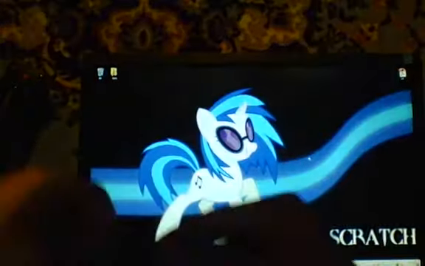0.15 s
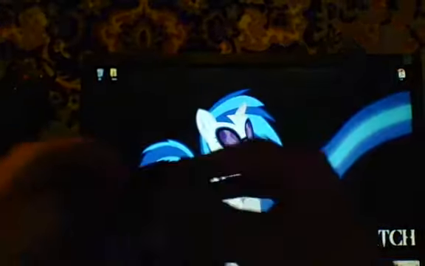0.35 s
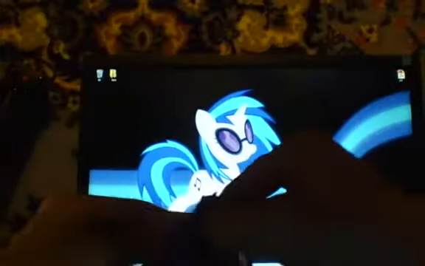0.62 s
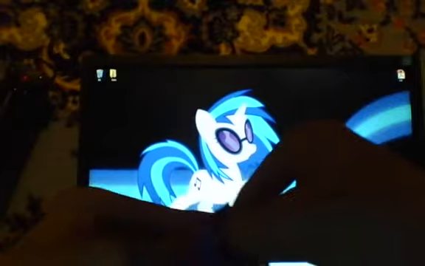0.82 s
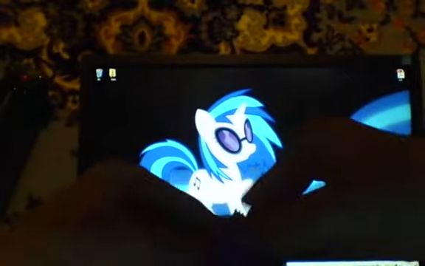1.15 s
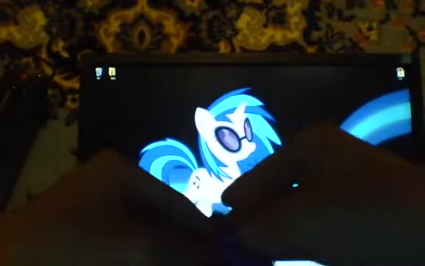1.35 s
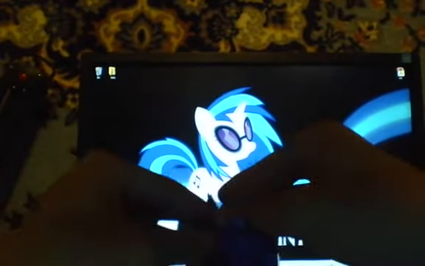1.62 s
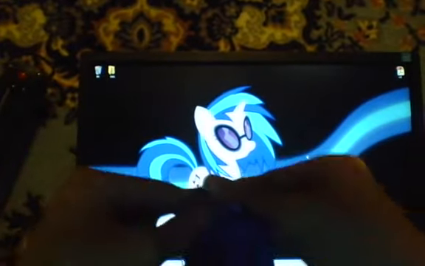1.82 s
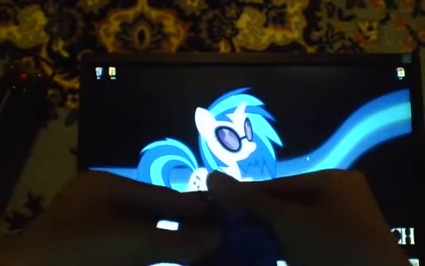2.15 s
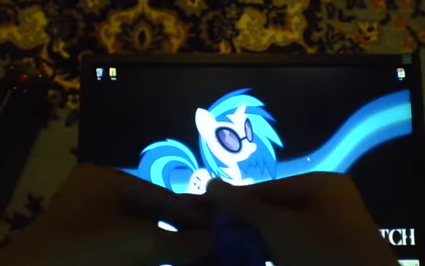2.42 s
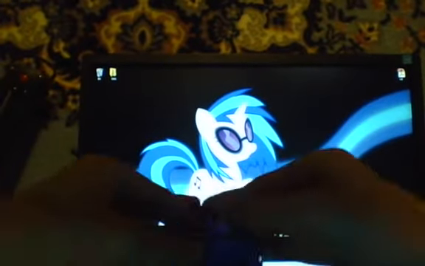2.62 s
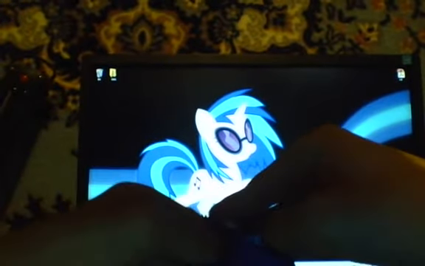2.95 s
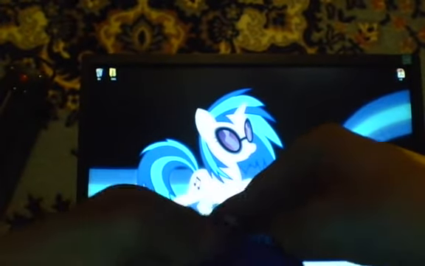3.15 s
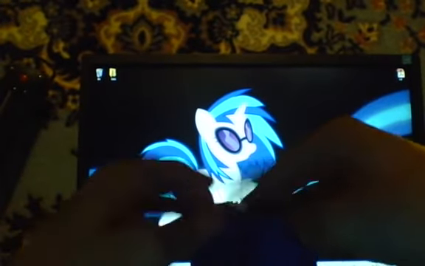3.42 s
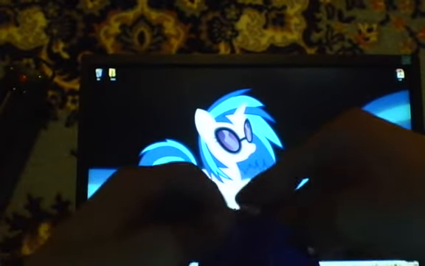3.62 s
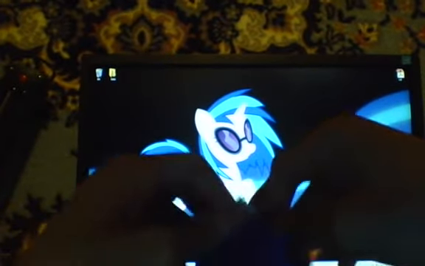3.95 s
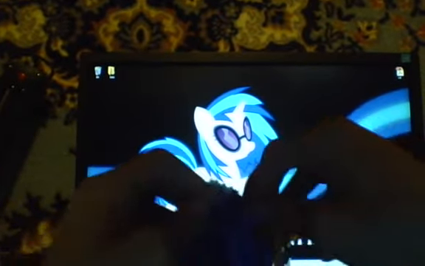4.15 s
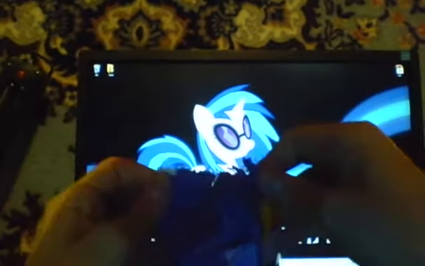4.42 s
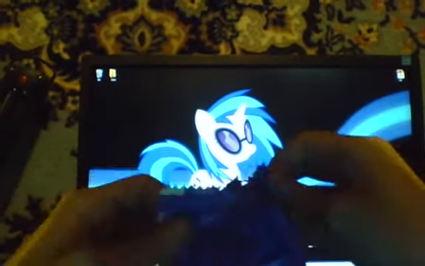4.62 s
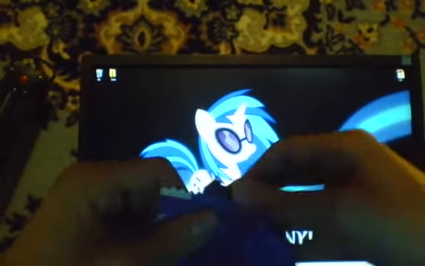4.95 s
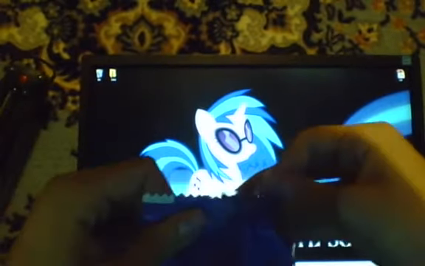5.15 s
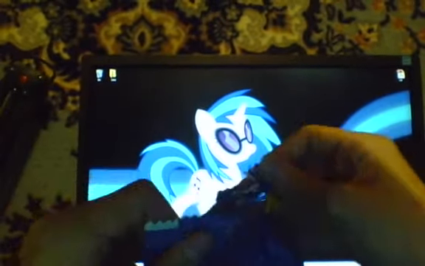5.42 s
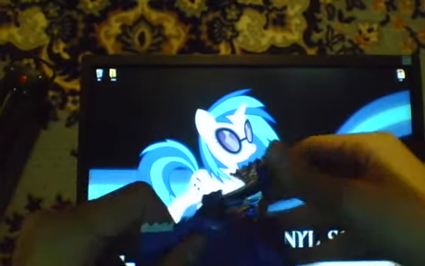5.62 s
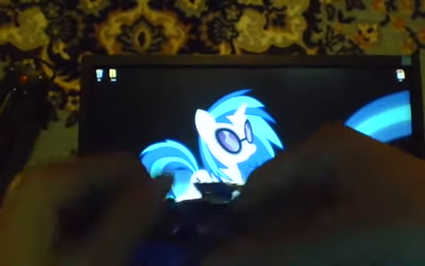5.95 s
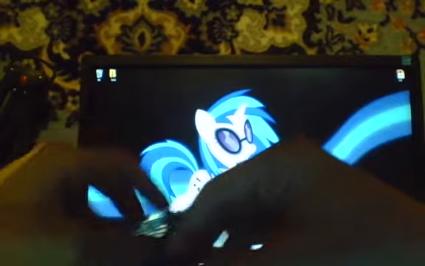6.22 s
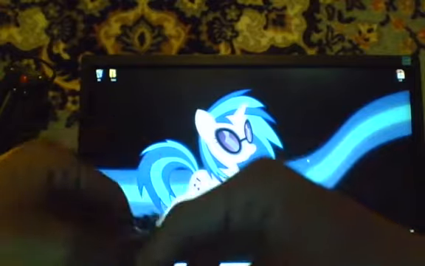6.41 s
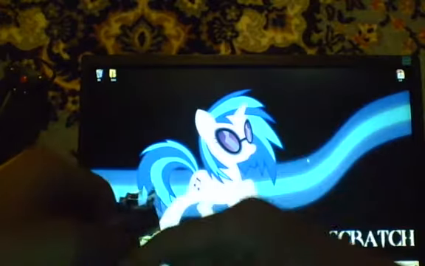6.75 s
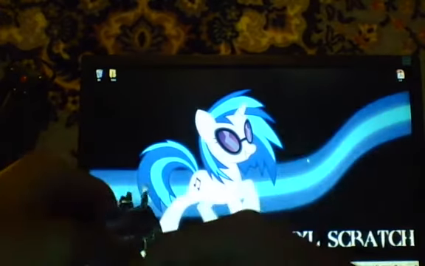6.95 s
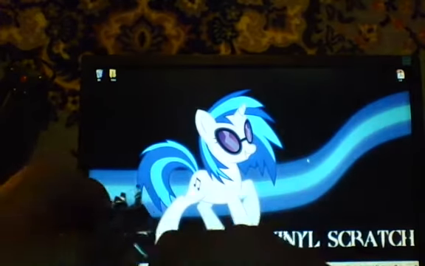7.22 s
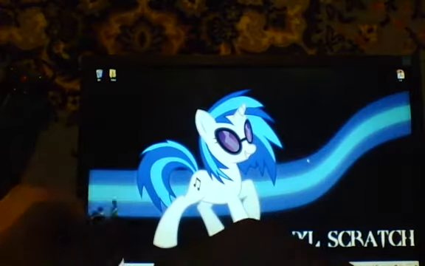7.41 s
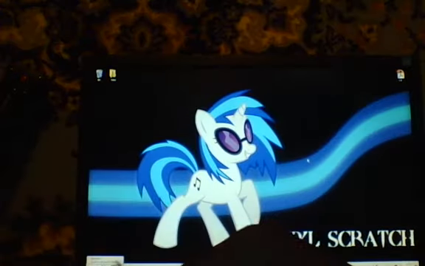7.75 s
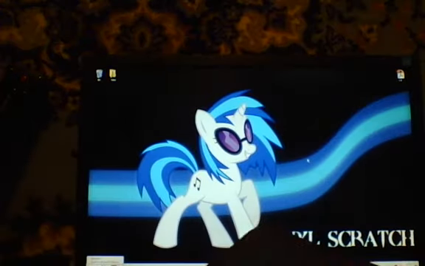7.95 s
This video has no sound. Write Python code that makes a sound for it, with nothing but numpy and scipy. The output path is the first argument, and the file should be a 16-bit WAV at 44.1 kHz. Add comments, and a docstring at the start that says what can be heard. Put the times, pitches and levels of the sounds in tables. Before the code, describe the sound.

A stiff plastic snack wrapper crackles and crinkles sharply in two hands, very close, with short tearing rasps, then thins to sparse ticks.

```python
"""Two hands pull open and crumple a plastic snack wrapper over a desk, very close to a small microphone.
From the start each squeeze excites a crackle of facets, creases buckle singly and seams rip in short rasps,
while flexing panels drive the enclosed air in soft pops. From 5.3 s the wrapper's sound slowly gains a hollow
band near 860 Hz; near 6.5 s film stick-slips on film in a thin squeak. Throughout, a small room answers with
echoes and a short tail over a steady hush, and the microphone rounds off the tallest peaks."""
import sys
import numpy as np
from scipy import signal
from scipy.fft import rfft, irfft, next_fast_len
from scipy.io import wavfile
from scipy.ndimage import uniform_filter1d

SR = 44100
rng = np.random.default_rng(int(sys.argv[2]) if len(sys.argv) > 2 else 0)


def dump(signal):
    """Clip the signal to [-1, 1] and save it as 16-bit WAV at the path in sys.argv[1]."""
    limited = np.clip(np.atleast_2d(signal).T, -1, 1)
    pcm = np.round(limited * 32767).astype(np.int16)
    wavfile.write(sys.argv[1], SR, pcm)


N = 355875

# Levels in the tables are relative; each source adds its own gain.
# The loudest creases snapping through: t/s, level/dB, facet ring f/Hz, brightness/dB
SNAPS = [(0.0093, -19, 4400, -1), (0.056, -15.5, 4630, 6), (0.084, -14, 4090, 7), (0.0985, -10, 3810, 2),
         (0.124, -6.5, 4130, 6), (0.3195, -17, 8450, 13), (0.421, -6.5, 1920, 2), (0.4559, -12, 6960, 13),
         (0.5111, -13, 5430, 5), (0.5241, -8, 7170, 12), (0.5522, -11, 5240, 6), (0.646, -8.5, 1980, -14),
         (0.7, -11, 7540, 7), (0.8073, -15, 6220, 6), (0.8205, -8.5, 5700, 9), (0.843, -11.0, 8050, 12),
         (0.898, -9, 7950, 2), (0.9368, -4, 5670, 9), (0.943, -14, 6960, 21), (0.9612, -14, 5900, 9),
         (1.0034, -13.5, 8700, 32), (1.0321, -14, 5810, 11), (1.123, -18.5, 5860, 8),
         (1.1585, -11, 7400, 11), (1.202, -12, 5040, 4), (1.2268, -9.5, 1180, -4), (1.251, -18, 3250, 3),
         (1.286, -28, 4800, 21), (1.3168, -13, 4290, 14), (1.348, -20, 7750, 18), (1.401, -18.0, 7600, 16),
         (1.432, -16, 7640, 15), (1.4728, -13.5, 3250, 20), (1.53, -10, 7600, 17),
         (1.5454, -17.5, 1920, -4), (1.5843, -16.5, 5350, 15), (1.6253, -9.5, 7470, 7),
         (1.6644, -14, 7970, 6), (1.6796, -18, 6300, 9), (1.7084, -16, 6440, 13), (1.7231, -11.5, 1880, 8),
         (1.736, -15.5, 6590, 6), (1.801, -11, 1810, -11), (1.872, -13.0, 5530, 3), (1.882, -21, 1900, -12),
         (1.9146, -12.5, 2640, 1), (1.932, -18.0, 3570, 15), (1.9593, -24, 7800, -2),
         (1.9828, -16, 6420, 2), (2.0346, -10.5, 7700, 9), (2.047, -7, 5100, 10), (2.0559, -15, 1200, -2),
         (2.087, -6.5, 7580, 23), (2.1262, -12.5, 4330, 9), (2.1681, -9, 3490, 5), (2.183, -11, 8000, 27),
         (2.2044, -13.5, 1980, 2), (2.2318, -10, 1770, 6), (2.2457, -16, 1900, -19),
         (2.2741, -5.5, 6100, 15), (2.3608, -15, 4390, 11), (2.4052, -9.5, 1840, -21),
         (2.451, -17.5, 7150, 7), (2.4801, -18.5, 2230, 1), (2.53, -17.0, 7760, 4), (2.5614, -11, 4760, 2),
         (2.6085, -7.5, 7840, 2), (2.629, -6, 8150, 18), (2.6925, -20, 3130, -5), (2.729, -14.5, 8400, 3),
         (2.8218, -8, 8100, 10), (2.916, -12, 7540, 10), (2.951, -12, 8230, -3), (3.0034, -11.5, 8570, 25),
         (3.0782, -13.5, 4590, 22), (3.0937, -12.0, 8870, 33), (3.1264, -14, 8890, 35),
         (3.2034, -7.5, 7690, 12), (3.284, -2.5, 3010, -2), (3.327, -6.5, 1810, 7), (3.3456, -9, 7360, 15),
         (3.3694, -9, 2700, 7), (3.4074, -1, 6840, 16), (3.4784, -6.5, 7430, -1), (3.5085, -7, 6370, 7),
         (3.5672, -12.0, 1870, -1), (3.5962, -8.5, 8120, 3), (3.6404, -15.5, 4930, -8),
         (3.69, -10, 1590, 0), (3.708, -12.5, 8460, 12), (3.738, -13.5, 6660, 0), (3.763, -6, 4400, 12),
         (3.7783, -10.0, 1680, 9.5), (3.812, -5.5, 4960, 5.5), (3.829, -8, 7340, 14),
         (3.8857, -7.5, 8050, -7.5), (3.8906, -11, 8100, 14), (3.9378, -12, 8590, 29), (3.955, -9, 5800, 0),
         (3.9616, -6, 1210, 6), (4.1846, -8, 2780, 13), (4.251, -3, 8250, 16), (4.4954, -9.5, 6600, 3),
         (4.6027, -7, 1270, 14), (4.6102, -13, 5030, 15), (4.6359, -14.5, 1750, -3), (4.6714, -8, 1850, 5),
         (4.718, -27, 5840, 12), (4.7415, -13.5, 5490, 7), (4.788, -9.5, 2970, 3), (4.8017, -8, 5540, 6),
         (4.8282, -6, 1600, 1), (4.842, -6.5, 1680, 6), (4.9544, -7, 8530, 2), (4.962, -5.5, 8530, 0),
         (4.9963, -12, 1460, 9), (5.035, -8.5, 4540, 12), (5.039, -7, 8800, 3), (5.0546, -6, 5630, 7),
         (5.078, -10, 8450, 13), (5.11, -11.5, 5400, 12), (5.131, -5, 3530, 16), (5.1674, -8, 8350, -2),
         (5.3366, -8, 3250, 4), (5.4233, -21.5, 7800, 11), (5.451, -12.5, 8900, 9.5),
         (5.485, -11.5, 4700, 1), (5.5388, -30, 7500, 3), (5.558, -12.5, 4160, 11), (5.64, -28, 1190, -12),
         (5.6903, -29.0, 1640, -1), (5.7382, -25, 7240, 19), (5.7504, -12.5, 6040, 9),
         (5.8169, -16, 3420, 16), (5.8254, -10, 2600, -5), (5.896, -16.0, 4460, 8), (5.9208, -13, 4690, 5),
         (5.945, -12, 3450, 10), (5.9644, -9.5, 4540, 13), (5.992, -10, 5000, 7), (6.057, -8.5, 5370, 3),
         (6.0975, -15, 7040, -3), (6.1207, -14.5, 6930, -1), (6.1782, -11, 3200, 5),
         (6.1893, -6.5, 7320, 10), (6.2344, -8, 5400, 7), (6.305, -10.5, 3050, -1),
         (6.3443, -14, 1370, -13), (6.389, -9.5, 1360, 0), (6.4063, -3.5, 4460, -1),
         (6.5805, -8.5, 3260, 3), (6.608, -12.5, 3420, 1), (6.6713, -15.5, 3020, 9), (6.7, -17.5, 5210, -3),
         (6.7594, -19.5, 4860, -2), (6.834, -22.5, 7860, 0), (6.8924, -29.0, 6960, 6),
         (7.005, -12, 5230, 5), (7.0445, -17.5, 4800, 8), (7.1058, -33.5, 1690, 0), (7.161, -25, 2350, -10),
         (7.2187, -11, 1910, 9), (7.274, -16.5, 7170, 15), (7.2888, -13.5, 3950, 11),
         (7.323, -15.5, 1810, 7), (7.3682, -13, 1890, 10), (7.375, -9, 4630, -2), (7.4504, -7.5, 1880, 0),
         (7.4672, -16, 1540, -5), (7.488, -11, 9060, 10), (7.504, -9.5, 4450, 0), (7.578, -11.5, 2400, 0),
         (7.6324, -14.0, 6700, 14), (7.7044, -3.5, 4070, -3), (7.737, -16.5, 4070, 5),
         (7.802, -22, 1360, 14), (7.8557, -20, 2610, -3), (7.8932, -18, 5500, 8), (7.9422, -21, 3420, -7),
         (7.9983, -14.5, 4180, 8.5), (8.0322, -22.5, 5840, 9), (8.059, -12.5, 8980, 12)]
# Squeezes of the hands: start t/s, end t/s, tiny facets level/dB, wide facets level/dB, rubbing level/dB
SQUEEZES = [(0, 0.05, -21.5, -20, -30.0), (0.095, 0.32, -25, -22.0, -29), (0.407, 0.555, -24, -21, -41.0),
            (0.562, 0.66, -18, -16, -28), (0.68, 0.727, -18, -22.5, -40), (0.81, 0.978, -18.5, -22, -52),
            (0.997, 1.09, -24.5, -56, -69), (1.104, 1.367, -19.5, -29.0, -55),
            (1.385, 1.548, -17.5, -23.5, -40.5), (1.707, 1.808, -26, -23, -39.5),
            (2.017, 2.148, -24.5, -27, -49), (2.183, 2.36, -21.5, -25.5, -67),
            (2.321, 2.418, -17.5, -24, -64), (2.55, 2.674, -18, -20.5, -40),
            (2.771, 2.893, -18.5, -22, -46), (2.904, 3.034, -21, -24, -45), (3.219, 3.3, -16.5, -21.5, -39),
            (3.344, 3.532, -17.5, -20, -38), (3.55, 3.846, -23, -25.5, -39.0),
            (3.946, 4.231, -15.5, -22, -31), (4.26, 4.46, -17, -18, -23), (4.482, 4.651, -23.5, -23, -32),
            (4.768, 4.905, -22.5, -22.0, -35.5), (4.957, 5.163, -22.5, -24.5, -33.5),
            (5.128, 5.349, -20, -17, -28), (5.427, 5.533, -27.5, -32, -49), (5.88, 6.096, -25, -26, -39.5),
            (6.102, 6.262, -18, -18.5, -35), (6.305, 6.46, -23.5, -35, -42),
            (6.482, 6.571, -12.5, -18, -32), (6.587, 6.773, -25.5, -31, -65), (7.018, 7.04, -31, -29, -44),
            (7.205, 7.222, -18.5, -36, -43), (7.28, 7.415, -31, -23, -33.5), (7.433, 7.53, -30, -24.0, -34),
            (7.633, 7.82, -28.5, -23, -39.5), (7.843, 7.921, -32.5, -22, -37)]
# Faint crackle of the held film, present throughout and beneath the squeezes: t/s, level/dB
HELD_CRACKLE = [(0, -24), (.35, -25.5), (.78, -29), (1.5, -59), (1.6, -41), (1.75, -36), (1.85, -42),
                (2.0, -35), (2.2, -30), (2.5, -36), (2.85, -27.5), (3.07, -40), (3.2, -27), (4.45, -20.5),
                (4.69, -52), (4.8, -34), (5.3, -39), (5.62, -49), (5.78, -45), (5.9, -30.5), (6.5, -23.5),
                (6.82, -58), (6.9, -48), (6.96, -52), (7.13, -57), (7.2, -33), (7.5, -37.5), (7.98, -48),
                (8.06, -23)]
# Film sliding on film instead of buckling (a reversed pair is empty): start t/s, end t/s
SLIDES = [(2.185, 2.21), (2.79, 2.74), (3.145, 3.195), (3.215, 3.24), (4.125, 4.165), (6.48, 6.6)]
# The seam ripping and folds collapsing in a run: start t/s, end t/s, level/dB, tiny-to-wide facet level/dB
RIPS = [(0.134, 0.178, -17.5, -1), (0.201, 0.239, -13, 0), (0.565, 0.604, -12, 4),
        (1.759, 1.774, -6.5, 5.5), (2.359, 2.397, -11.5, 11), (3.234, 3.268, -8, 10.5),
        (3.991, 4.118, -10, 5), (4.129, 4.155, -8, 11), (4.275, 4.359, -2.5, 5.5), (4.403, 4.44, -12, 0.5),
        (5.03, 5.046, -13, 2.5), (5.171, 5.247, -12, 4), (6.181, 6.196, -16, 0)]
# Whole panels of the bag flexing: t/s, level/dB, pitch f/Hz
FLEXES = [(0.048, -24.0, 496), (0.154, -11.5, 697), (0.224, -15, 290), (0.597, -19, 486),
          (1.17, -27.0, 428), (1.511, -20.5, 546), (1.763, -12, 466), (2.05, -16, 515), (3, -31, 444),
          (3.406, -27.0, 398), (3.479, -21.5, 388), (3.564, -22, 470), (3.886, -25, 450), (3.961, -20, 463),
          (4.106, -16.5, 483), (4.184, -24, 447), (4.344, -7, 473), (4.501, -22, 466), (4.604, -20, 475),
          (4.962, -17.5, 434), (5.031, -17, 470), (5.16, -16.0, 409), (5.235, -17, 468), (5.265, -15, 480),
          (5.335, -17, 290), (5.468, -19.5, 443), (5.635, -34.5, 680), (5.698, -29.5, 692),
          (5.846, -31, 483), (5.942, -20, 435), (6.137, -15, 472), (6.189, -16, 462), (6.385, -17.5, 438),
          (6.759, -27, 468), (6.833, -25, 229), (7.058, -26.5, 466), (7.104, -29.5, 474),
          (7.215, -21.5, 477), (7.281, -20.5, 300), (7.318, -20.5, 283), (7.501, -20.5, 470),
          (7.678, -24, 483), (7.859, -23.5, 518)]
# The taut strip singing as film slides on film: t/s, level/dB
SQUEAK = [(6.465, -55), (6.495, -24), (6.53, -12), (6.545, -7), (6.57, -26), (6.595, -60)]
# The bag bumping against the moving hands: start t/s, end t/s, level/dB
BUMPS = [(0, .02, -37), (0.16, 0.256, -25), (0.412, 0.467, -35), (0.507, 0.653, -29.5), (0.902, 0.952, -35),
         (1.246, 1.3, -37), (1.48, 1.545, -36.5), (1.74, 1.78, -48), (2.03, 2.087, -39), (2.59, 2.652, -38),
         (3.26, 3.42, -41), (4.28, 4.38, -34), (4.952, 4.997, -30.5), (5.18, 5.356, -32.5),
         (6.367, 6.56, -39.5), (6.834, 6.883, -43), (6.998, 7.057, -39.5), (7.632, 7.693, -29.5),
         (7.756, 7.88, -46)]
# Resonances of the air in the bag and its panels: f/Hz, width f/Hz, lift level/dB
BAG_MODES = [(226, 31, 2.5), (310, 107, 4), (474, 82, 9), (693, 79, 7), (968, 40, 2.5), (1403, 230, 4.5),
             (1810, 240, 5)]
# Spectrum of a snap: f/Hz, level/dB
SNAP_COLOUR = [(60, -26), (170, -27), (290, -18), (750, -14.5), (1000, -7.5), (3000, 0), (7800, 2.5),
               (9500, -1.5), (12000, -11), (16000, -23)]
# Spectrum of the tiny facets: f/Hz, level/dB
TINY_COLOUR = [(1000, -32.5), (2800, -8), (4500, -3.5), (7800, 0), (9500, -3.5), (12000, -14), (16000, -21)]
# Spectrum of the wide facets: f/Hz, level/dB
WIDE_COLOUR = [(200, -22.5), (750, -15.5), (1000, 0), (2500, -1), (3700, -1), (5500, -4.5), (10000, -34)]
# Spectrum of rubbing fingers and of the puff of a flexing panel: f/Hz, level/dB
RUB_COLOUR = [(80, -23.5), (165, -6), (200, -1.5), (280, 2.5), (500, 1), (800, -1.5), (1400, -15),
              (4000, -50)]
# Spectrum of the dull rumble of hands and bag: f/Hz, level/dB
RUMBLE_COLOUR = [(15, -17), (28, -5), (42, -1), (62, -4), (90, 1), (125, -3), (185, 0), (300, -16),
                 (800, -55)]
# Decay of the furnished room: f/Hz, 60 dB decay time t/s
ROOM_DECAY = [(150, 0.15), (500, 0.2), (2000, 0.27), (7000, 0.072), (14000, 0.083)]
# Spectrum of the room's background: f/Hz, level/dB
HUSH_COLOUR = [(25, 10), (130, 18), (250, -16), (560, -1), (900, -29), (2500, -36), (7000, -44),
               (11000, -41), (16000, -42)]
# Response of the microphone: f/Hz, level/dB
MICROPHONE = [(20, -0.5), (8000, 0.5), (10000, -2), (12000, -6.5), (16000, -7.5)]

# Envelopes of hand movements: attack/s, release time constant/s, rise from edge to middle/dB
GRIP_S, RELAX_S, ARCH_DB = 0.022, 0.015, 1.5
BUMP_RISE_S, BUMP_FADE_S, BUMP_ARCH_DB = 0.0078, 0.034, 5
# The film quiets under strain before a snap and crackles as it settles: time constants/s, levels/dB
STRAIN_S, STRAIN_DIP_DB = 0.018, 2.5
SETTLE_S, SETTLE_DB = 0.019, -16.5
HOLLOW_S = 5.3  # the hollow band begins to grow
TOP_HZ = 15800  # band limit of the microphone


def amp(db):
    """The amplitude ratio equivalent to a level in decibels."""
    return 10 ** (np.asarray(db) / 20)


def unit(x):
    """The signal normalised to rms 1."""
    return x / np.sqrt(np.mean(x ** 2) + 1e-20)


def along(points, hz):
    """Interpolation of (f/Hz, value) points on a logarithmic frequency axis."""
    f, value = np.transpose(points)
    return np.interp(np.log(hz + 1), np.log(f + 1), value)


def curves(rows):
    """Linear interpolation in time: one value per sample for each column after t."""
    s, *columns = np.transpose(rows)
    t = np.arange(N) / SR
    return [np.interp(t, s, column) for column in columns]


def place(times, sounds):
    """Superposition: rows of sound summed at their start times."""
    first = np.maximum(np.round(times * SR), 0).astype(int)
    at = first[:, None] + np.arange(sounds.shape[1])
    return np.bincount(at.ravel(), sounds.ravel(), N)[:N]


def causal(gain_db):
    """Minimum phase: folding the cepstrum gives a causal response with these gains."""
    cepstrum = irfft(np.log(np.maximum(amp(gain_db), 1e-6)))
    k = np.arange(cepstrum.shape[-1])
    fold = np.where(k == 0, 1, 2 * (k < len(k) / 2))
    return np.exp(rfft(cepstrum * fold))


def bag_db(hz):
    """Resonance: each mode of the bag lifts the sound of the film around its centre frequency."""
    return sum(db / (1 + (2 * (hz - centre) / width) ** 2) for centre, width, db in BAG_MODES)


def through_bag(x, colour, size=4096):
    """Linear filtering: x takes on a spectrum and the resonances of the bag."""
    hz = np.fft.rfftfreq(size, 1 / SR)
    impulse_response = irfft(causal(along(colour, hz) + bag_db(hz)))
    return signal.oaconvolve(x, impulse_response)[:N]


def flicks(rate, size_db, life, size=400):
    """Shot noise: the rms-1 envelope of facets flicking at uneven moments, many small and a few large."""
    count = int(rate * N / SR)
    when, strength, length = rng.random((count, 3)).T[:, :, None]
    u = np.arange(size) / SR / (life * (.5 + length))
    power = (amp(size_db * strength ** 2) * u * np.exp(-u)) ** 2
    times = (np.arange(count) + 2 * when[:, 0]) / rate
    return unit(np.sqrt(place(times, power)))


def film(envelope, colour):
    """Modulated noise: the film flutters under an envelope and radiates through the bag at rms 1."""
    return unit(through_bag(envelope * rng.standard_normal(N), colour))


def stroke(start, end, attack, release, arch_db):
    """The envelope of one hand movement: it takes hold, swells toward its middle and decays."""
    t = np.arange(N) / SR
    progress = np.clip((t - start) / (end - start), 0, 1)
    swell = amp(arch_db * (np.sin(np.pi * progress) - 2 / np.pi))
    rise = np.clip((t - start) / attack + .5, 0, 1)
    return swell * rise * np.exp(-np.clip((t - end) / release, 0, 20))


def squeezing():
    """Power summation: squeezes combine into drives for tiny facets, wide facets and rubbing fingers."""
    shapes = np.array([stroke(start, end, GRIP_S, RELAX_S, ARCH_DB) for start, end, *_ in SQUEEZES])
    levels = np.array(SQUEEZES)[:, 2:].T
    return np.sqrt(amp(levels) ** 2 @ shapes ** 2)


def snaps(level_db, rise, ring_db, wide_db, ring_octaves, tilt, edge, scatter_db,
          after_db, after_t60, lead_db, lead, size=2048):
    """Snap-through buckling: a crease yields a little, flutters briefly and rings the facet beside it."""
    s, db, ring_hz, bright_db = np.transpose(SNAPS)[:, :, None]
    t = np.arange(size) / SR - .003  # begins 3 ms ahead of the snap
    hz = np.fft.rfftfreq(size, 1 / SR)
    pace, early, late = rng.random((len(s), 3)).T[:, :, None]

    def burst(start):
        """A smooth pulse that rises and decays at the crease's own pace."""
        u = np.maximum(t - start, 0) / (rise * (0.56 + pace))
        return (u * np.exp(1 - u)) ** 2

    side_bursts = burst(-lead * (.5 + early)) + burst(0.0015 + 0.0067 * late)
    settling = amp(after_db - 60 * np.abs(t) / after_t60) * (t > 0)
    shape = burst(0) + amp(lead_db) * side_bursts + settling
    flutter = rng.standard_normal((len(s), size)) * shape
    # wide facets ring more clearly
    lift_db = ring_db + wide_db * np.clip(np.log2(6000 / ring_hz), 0, 1)
    facet = lift_db / (1 + (np.log2((hz + 1) / ring_hz) / ring_octaves) ** 2)
    slope = tilt * (bright_db - np.median(bright_db)) * np.tanh(2 * np.log((hz + 1) / 4000)) / 2
    slope = slope * np.clip(hz / 1200, 0, 1)  # the bass belongs to the bag, whatever the facet
    # the crispest snaps reach higher
    slope = slope + edge * np.clip(bright_db - 8.5, 0, 14) * np.clip((hz - 8000) / 4000, 0, 1)
    # every fold has its own shape, and so its own weaker modes
    scatter = rng.standard_normal((len(s), len(hz)))
    modes = scatter_db * unit(uniform_filter1d(uniform_filter1d(scatter, size=40), size=30))
    response = causal(along(SNAP_COLOUR, hz) + bag_db(hz) + facet + slope + modes)
    sound = irfft(rfft(flutter) * response)
    onset = sound[:, (t > 0) & (t < .004)]  # level is set by the rms of the first 4 ms
    sound /= np.sqrt(np.mean(onset ** 2, axis=1, keepdims=True))
    return place(s[:, 0] + t[0], sound * amp(db + level_db))


def strain_and_settle():
    """Strain and relaxation: the gain of the lull before every snap and the strength of its after-crackle."""
    s, db = np.transpose(SNAPS)[:2, :, None]
    t = np.arange(SR // 10) / SR
    before = np.maximum(s - t[-1], 0)
    strain = (before + t < s) * np.exp(-np.abs(s - before - t) / STRAIN_S)
    lull = place(before[:, 0], strain)
    settling = np.sqrt(place(s[:, 0], (amp(db + SETTLE_DB) * np.exp(-t / SETTLE_S)) ** 2))
    return amp(-STRAIN_DIP_DB * np.minimum(lull, 1)), settling


def facets(x, depth_db):
    """Spectral variation: facets of many sizes make the colour change from one flick to the next."""
    z = signal.stft(x, nperseg=256)[2]
    field = uniform_filter1d(rng.standard_normal(z.shape), size=6, axis=0)
    field = uniform_filter1d(field, size=3, axis=1)
    return unit(signal.istft(z * amp(depth_db * unit(field)), nperseg=256)[1][:N])


def crumple(tiny_drive, wide_drive, tiny_gain_db, wide_gain_db, held_tiny_db, held_wide_db,
            settle_wide_db, own):
    """Partly correlated shot noise: buckles shake tiny and wide facets together; some flick on their own."""
    held_db, = curves(HELD_CRACKLE)
    lull, settling = strain_and_settle()
    t = np.arange(N) / SR
    sliding = sum(1. * ((t > start) & (t < end)) for start, end in SLIDES)
    sliding = uniform_filter1d(sliding, size=800)

    def smooth(envelope):
        """Sliding film hisses evenly."""
        return (1 - sliding) * unit(envelope) + sliding

    shared = flicks(rate=380, size_db=24.0, life=0.00077)
    tiny = film(smooth(shared + own * flicks(rate=660, size_db=25.0, life=0.00042)), TINY_COLOUR)
    wide = film(smooth(shared + own * flicks(rate=250, size_db=17.5, life=0.00087)), WIDE_COLOUR)
    squeeze_lull = lull ** .5  # squeezed film dips half as many dB as held film
    tiny_level = np.hypot(amp(tiny_gain_db) * tiny_drive * squeeze_lull, amp(held_db + held_tiny_db) * lull)
    wide_level = np.hypot(amp(wide_gain_db) * wide_drive * squeeze_lull, amp(held_db + held_wide_db) * lull)
    tiny_level = np.hypot(tiny_level, settling)
    wide_level = np.hypot(wide_level, amp(settle_wide_db) * settling)
    return tiny_level * facets(tiny, depth_db=2.5) + wide_level * facets(wide, depth_db=4.0)


def rips(level_db, edge, release):
    """Rapid successive fracture: the seam lets go so fast that the cracks merge into a rasp."""
    t = np.arange(N) / SR
    cracks = flicks(rate=1100, size_db=19.5, life=0.00038)
    tiny, wide = film(cracks, TINY_COLOUR), film(cracks, WIDE_COLOUR)
    out = np.zeros(N)
    for start, end, db, bright_db in RIPS:
        pull = np.clip((t - start) / edge, 0, 1) * np.exp(-np.clip((t - end) / release, 0, 20))
        out += amp(db + level_db) * pull * unit(wide + amp(bright_db) * tiny)
    return out


def squeak(squeak_hz, width_hz):
    """Stick-slip friction: film slipping on film drives one narrow resonance of a taut strip."""
    slips = flicks(rate=1000, size_db=9, life=.0003) * rng.standard_normal(N)
    t = np.arange(N) / SR
    sliding = (t > SQUEAK[0][0]) & (t < SQUEAK[-1][0])
    strip = signal.iirpeak(squeak_hz, squeak_hz / width_hz, SR)
    return sliding * amp(curves(SQUEAK)[0]) * unit(signal.lfilter(*strip, slips))


def flexes(level_db, t60, attack, puff, overtone, overtone_db, size=4096):
    """Panel inversion: a flip pushes the air in the bag into a short note with one overtone and a puff."""
    s, db, hz = np.transpose(FLEXES)[:, :, None]
    t = np.arange(size) / SR
    swell = amp(db + level_db - 60 * t / t60) * (1 - np.exp(-t / attack))
    breath = unit(through_bag(rng.standard_normal(N), RUB_COLOUR))
    air = place(s[:, 0], swell * np.exp(-t / 0.012)) * breath
    fundamental = np.sin(2 * np.pi * hz * t)
    upper = amp(overtone_db) * np.exp(-t / 0.014) * np.sin(2 * np.pi * overtone * hz * t)
    return place(s[:, 0], swell * (fundamental + upper)) + puff * air


def hands(rub_drive, rub_gain_db, squeeze_rumble_db, bump_gain_db, bump_rub_db, resting_db):
    """Friction and impact: fingers catch and rub with every squeeze; a bump adds a dull rumble."""
    bumps = sum(amp(db + bump_gain_db) * stroke(start, end, BUMP_RISE_S, BUMP_FADE_S, BUMP_ARCH_DB)
                for start, end, db in BUMPS)
    rumble = film(flicks(rate=260, size_db=12.5, life=0.0021), RUMBLE_COLOUR)
    rub = film(flicks(rate=320, size_db=13.5, life=0.0014), RUB_COLOUR)
    rumbling = np.hypot(bumps, amp(squeeze_rumble_db) * rub_drive)
    rubbing = np.hypot(amp(rub_gain_db) * rub_drive, amp(bump_rub_db) * bumps) + amp(resting_db)
    return rumbling * rumble + rubbing * rub


def hollow_band(x, centre_hz, width_hz, level_db, growth):
    """Band-pass resonance: the wrapper's sound slowly gains a hollow band over the growth time."""
    presence = np.clip((np.arange(N) / SR - HOLLOW_S) / growth, 0, 1)
    band = signal.iirpeak(centre_hz, centre_hz / width_hz, SR)
    return presence * amp(level_db) * signal.lfilter(*band, x)


def room(x, early_db, tail_db, count=10):
    """Reflection and reverberation: desk and screen return weak copies; the furnished room adds a tail."""
    hz, t, z = signal.stft(rng.standard_normal(SR // 3), SR, nperseg=256)
    decay = amp(-60 * t / along(ROOM_DECAY, hz)[:, None])
    tail = signal.istft(z * decay, SR, nperseg=256)[1]
    answer = amp(tail_db) * np.pad(tail / np.linalg.norm(tail), (SR // 200, 0))  # tail begins after 5 ms
    delay = rng.uniform(.002, .016, count)
    copies = rng.choice([-1, 1], count) * np.exp(-delay / 0.012)
    answer[(delay * SR).astype(int)] += amp(early_db) * copies
    return signal.oaconvolve(x, answer)[:N]


def hush(level_db):
    """Stationary noise: the steady background of the room."""
    hz = np.fft.rfftfreq(N, 1 / SR)
    spectrum = rfft(rng.standard_normal(N)) * amp(along(HUSH_COLOUR, hz))
    return amp(level_db) * unit(irfft(spectrum, N))


def scene():
    """Superposition: the sources on the wrapper, the hollow band, the room's answer and the background."""
    tiny_drive, wide_drive, rub_drive = squeezing()
    # names in _db are dB, in _hz Hz, in _octaves octaves; times are in seconds
    wrapper = snaps(level_db=1.5, rise=0.00078, ring_db=6, wide_db=5.5, ring_octaves=0.18, tilt=1.0,
                    edge=0.5, scatter_db=3.5, after_db=-12, after_t60=0.023, lead_db=-15, lead=.0018)
    wrapper = wrapper + crumple(tiny_drive, wide_drive, tiny_gain_db=0.5, wide_gain_db=-2.5,
                                held_tiny_db=-1, held_wide_db=-2.5, settle_wide_db=-4, own=0.85)
    wrapper = wrapper + rips(level_db=1.0, edge=0.0033, release=0.0029)
    wrapper = wrapper + squeak(squeak_hz=7800, width_hz=220)
    wrapper = wrapper + flexes(level_db=3, t60=0.062, attack=0.0016, puff=0.8, overtone=2.06, overtone_db=-2)
    wrapper = wrapper + hands(rub_drive, rub_gain_db=-1.5, squeeze_rumble_db=-10.5, bump_gain_db=-2.5,
                              bump_rub_db=-2, resting_db=-52)
    wrapper = wrapper + hollow_band(wrapper, centre_hz=860, width_hz=350, level_db=-17.5, growth=1.8)
    return (wrapper + room(wrapper, early_db=-18.0, tail_db=-20.5) + hush(level_db=-56))[None]


def record(dry, ceiling=0.84, hardness=4):
    """Saturation and band limiting: the microphone rounds tall peaks, dulls the top and cuts at its limit."""
    rounded = dry / (1 + np.abs(dry / ceiling) ** hardness) ** (1 / hardness)
    m = next_fast_len(N + SR // 4)
    hz = np.fft.rfftfreq(m, 1 / SR)
    response = amp(along(MICROPHONE, hz)) * (hz < TOP_HZ)
    return irfft(rfft(rounded, m) * response, m)[..., :N]


dry = scene()
out = record(dry)
dump(out)
```